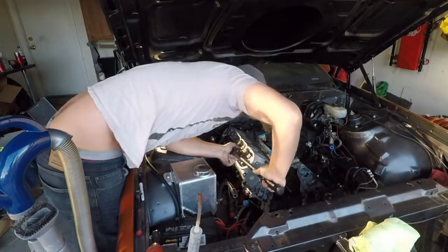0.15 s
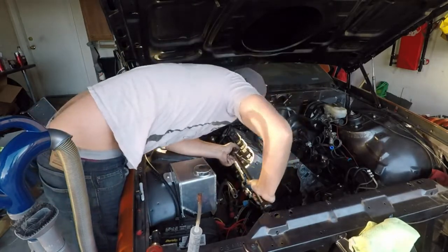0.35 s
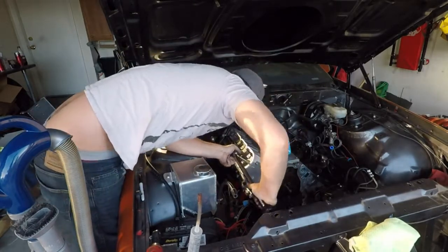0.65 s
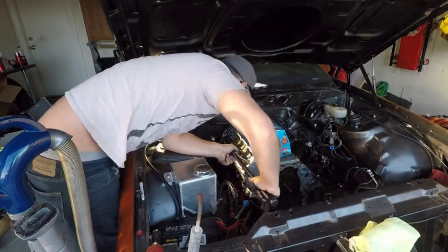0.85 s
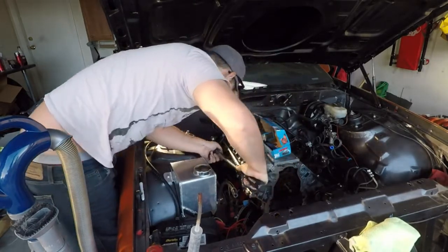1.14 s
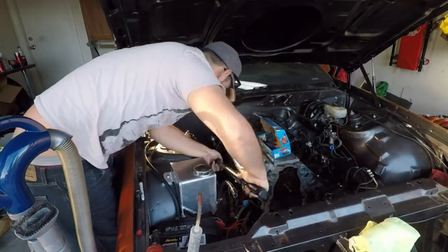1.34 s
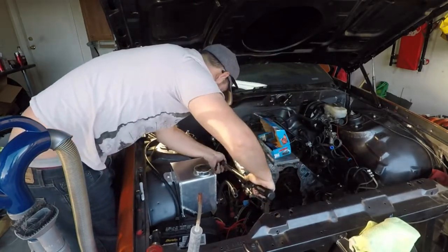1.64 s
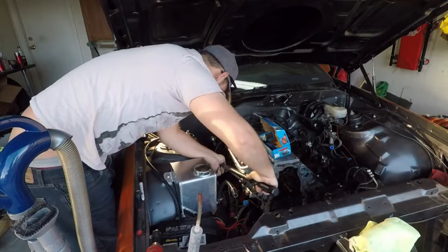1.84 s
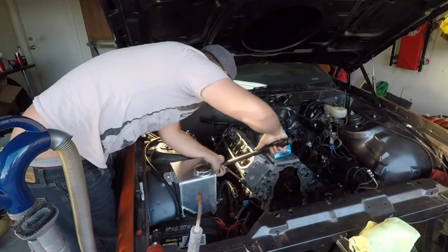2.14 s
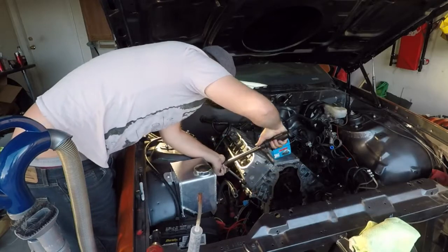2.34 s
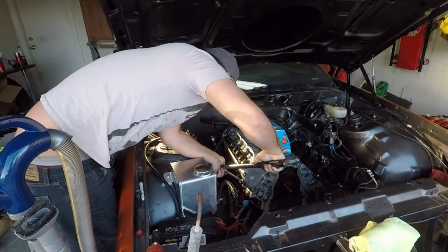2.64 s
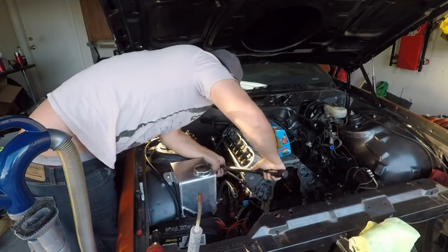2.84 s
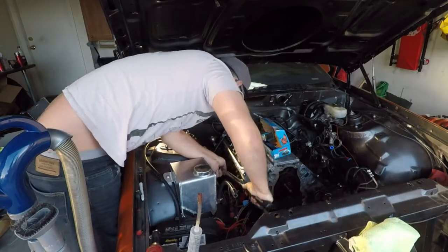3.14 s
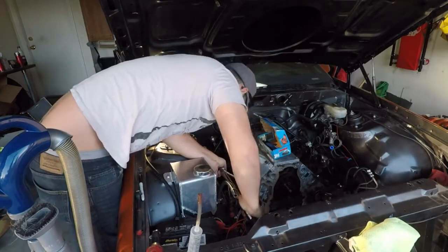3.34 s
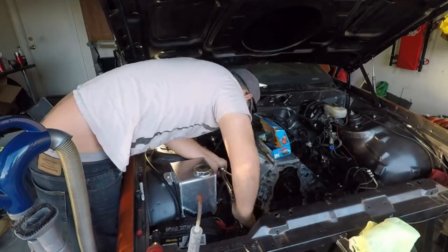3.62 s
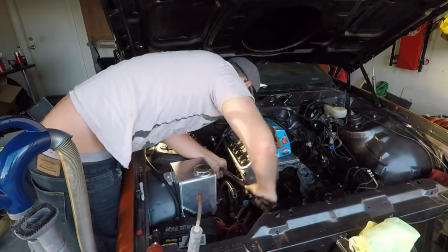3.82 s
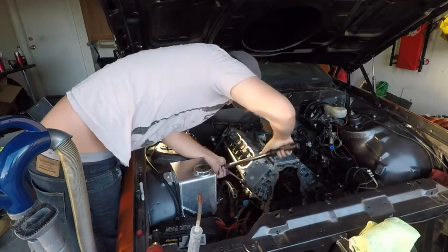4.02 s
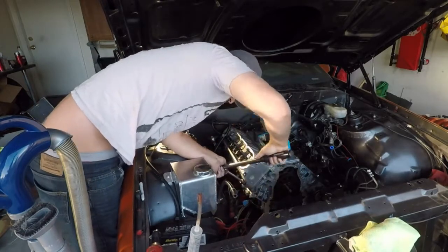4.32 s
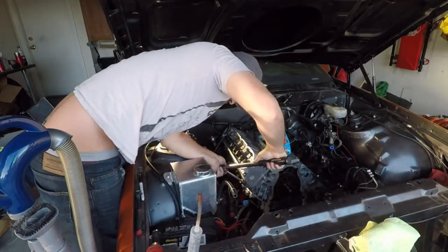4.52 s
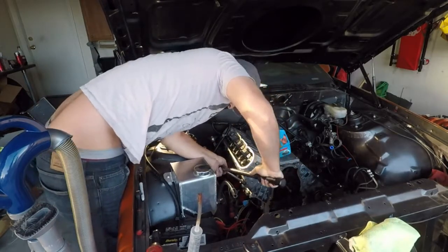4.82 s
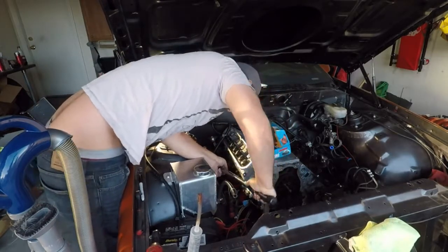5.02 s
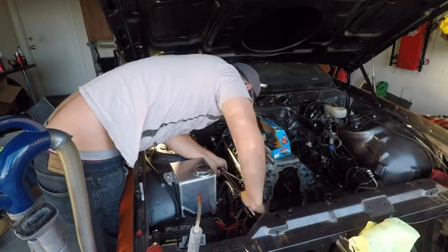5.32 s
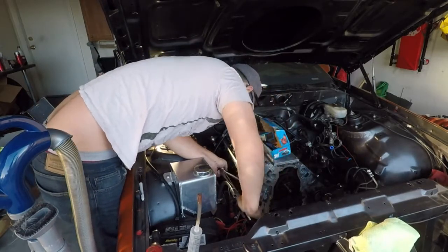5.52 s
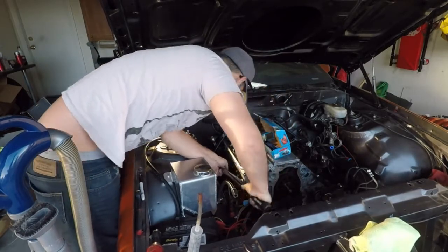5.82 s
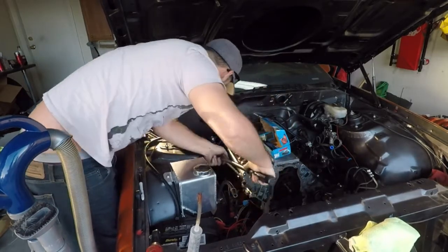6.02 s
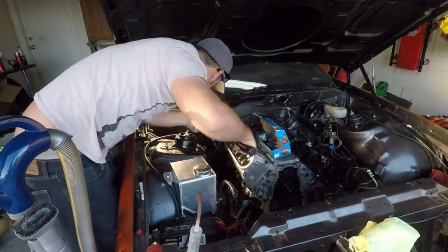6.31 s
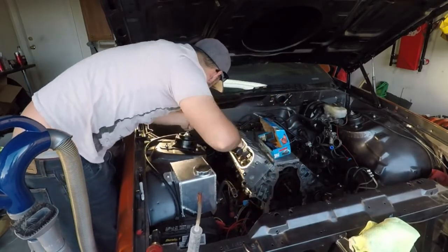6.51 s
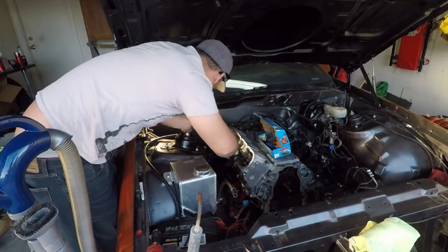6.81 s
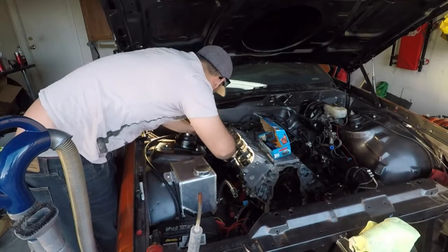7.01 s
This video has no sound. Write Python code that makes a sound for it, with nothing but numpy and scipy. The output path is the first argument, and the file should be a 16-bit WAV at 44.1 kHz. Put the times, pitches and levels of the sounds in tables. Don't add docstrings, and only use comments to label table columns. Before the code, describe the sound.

Two hard, bright steel cracks open the scene, followed by several quieter socket knocks on an engine. After a lull, six thin ratchet teeth tick past quickly; a second pair of cracks comes later, then light knocks and tiny ticks. The sound is close and dry with a brief garage echo. Low buffeting air presses on the small microphone and swells in the last second, above soft distant traffic and hiss.

```python
import sys
import numpy as np
from scipy import signal
from scipy.fft import rfft, irfft
from scipy.io import wavfile
from scipy.ndimage import uniform_filter1d

SR = 44100
rng = np.random.default_rng(int(sys.argv[2]) if len(sys.argv) > 2 else 0)


def natural_amplitude(level_db):
    exponent = np.asarray(level_db, float) / 20
    return 10 ** exponent


def dump_mix(stems):
    frames = np.atleast_2d(stems).T
    limited = np.clip(frames, -1, 1)
    pcm = np.round(limited * 32767).astype(np.int16)
    wavfile.write(sys.argv[1], SR, pcm)


N = 315756

# start_s, end_s, pitch_hz, level_db
DRONES = [
    (1.292, 3.492, 255.8, -65),
    (2.897, 3.601, 187.8, -66),
    (3.7, 5.298, 143.6, -63),
]
# freq_hz, density_db (per Hz)
WASH_COLOUR = [(50, -43), (90, -5.5), (160, -2.5), (255, -4), (360, -7.5), (500, -6.5), (800, -8),
               (1200, -14), (1700, -22.5), (2600, -27.5), (4000, -30), (7000, -37.5), (14000, -41),
               (16000, -52)]
WASH_DB = -51.5

# time_s, level_db
WIND = [(0, -30.5), (.4, -56), (.65, -37.5), (1.1, -42), (1.5, -43), (1.9, -42), (2.25, -48.5), (2.75, -57),
        (3.1, -48), (3.25, -44), (3.6, -36), (4.35, -42.5), (4.7, -33.5), (5.1, -42.5), (5.55, -31.5),
        (5.65, -30), (6.45, -27), (7.16, -17.5)]
WIND_REF_DB = -35
# time_s, half_length_s, rise_db, sharpness (0-1)
GUSTS = [(0.326, 0.059, 10, 0.36), (0.642, 0.03, 7, 0.24), (0.822, 0.039, 14, 0.48),
         (0.958, 0.055, 9.5, 0.97), (1.18, 0.07, 7, 0.66), (1.441, 0.076, 11, 0.6), (1.695, 0.023, 6, .2),
         (2.274, 0.054, 15.5, 0.1), (3.22, 0.039, 4.5, 0.59), (3.352, 0.032, -0.5, 0.5),
         (3.576, 0.044, 6.5, 0.9), (3.677, 0.032, 7, 0), (4.079, 0.037, 8, 0), (4.557, 0.02, 5, 0.5),
         (4.65, 0.038, 8, 0.94), (4.92, 0.056, 5.5, 0.23), (5.259, 0.057, 12, 0.07),
         (5.45, 0.057, 1.5, 0.2), (5.61, 0.056, 9, 0.88), (5.755, 0.12, 14, 0.74), (5.946, 0.039, 8.5, .3),
         (6.09, 0.043, 14, 0.57), (6.2, .05, 8, 0.53), (6.284, .04, 5, 0.6), (6.443, 0.049, 7, 0),
         (6.675, 0.071, 8, 0.86), (6.85, 0.062, 5, 0.76), (6.953, 0.038, 7, 0.78), (7.09, 0.032, 8.5, 1)]
# freq_hz, density_db (per Hz)
PUSH = [(1, -20), (3, -1), (12, -1), (18, -8), (30, -50), (60, -120)]
THROB = [(8, -80), (14, -25), (18, -1), (35, -5), (55, -12), (80, -50), (150, -120)]
FLUTTER = [(25, -91), (45, -27.5), (55, 8.5), (100, -5.5), (150, -14.5), (250, -39.5), (600, -120)]
RUFFLE = [(60, -92.5), (120, -23.5), (150, 4), (300, -9.5), (500, -15), (1000, -46.5), (3000, -110)]
# level_db (at reference wind), slope_db_per_db, favoured_sharpness (0-1), levelling_s
DEPTHS = [
    (-26, 0.64, 0.09, 0.36),
    (-36.5, 0.94, 0.2, 0.13),
    (-47.5, 0.98, .75, 0.056),
    (-69, 1.4757, 0.93, 0.085),
]

# freq_hz, t60_s
GARAGE_T60 = [(500, .45), (1500, .45), (4000, 0.27), (8000, 0.21), (14000, 0.13)]
LATE_DB, LATE_T60_S = -27.5, 1.1

# freq_hz, density_db (per Hz)
CRACK_COLOUR = [(240, -51), (400, -44.5), (663, -47), (1080, -12.5), (3110, -4), (3680, -4), (4420, -5.5),
                (5560, -1), (7910, -13.5), (10700, -6.5), (15500, -15.5)]
# freq_hz, t60_s
CRACK_T60 = [(500, 0.3), (1300, 0.11), (3500, 0.076), (9000, .065), (15000, 0.044)]
SNAP, SNAP_S = 0.91, 0.0017
BLUR_HZ, BLUR_SHARE = 45, .006
EDGE_DB_PER_OCTAVE = 23
KNOCK_S, HEAVY_S = 0.0043, 0.01

# freq_hz, level_db, t60_s
BREAK_MODES = [(1500, -16, .09), (2170, -10, .07), (3480, 3, .08), (4020, -6, .07), (4325, -7, .08),
               (5350, -5, .07), (5715, -6, .06), (6400, -10, .06), (9340, -13, .05), (10830, -17, .3),
               (10920, -9, .08)]
RESET_MODES = [(912, -15, .1), (2175, -7, .08), (2550, -6, .06), (2900, -8, .07), (3680, -11, .18),
               (3822, -1, .055), (5170, -3, .05), (5800, -8, .07), (10595, -9, .1), (10790, -19, .3),
               (12700, -11, .03)]
PAWL_MODES = [(3150, -25.5, .04), (4570, -2, 0.036), (5430, -1, 0.06), (9800, -20, 0.04),
              (10200, -7, 0.042), (11700, -24, .04)]
SOCKET_MODES = [(800, -15, .05), (925, -5, .075), (1265, -9, .045), (2320, -8, .05), (3450, -6, .045),
                (5200, -7, .04)]

# time_s, peak_db, contact_ring_hz
TICKS = [(1.8007, -54, 2487), (2.335, -49.5, 2168), (2.4005, -52, 1940), (2.49, -47.5, 2730),
         (3.782, -48, 2550), (4.3056, -49, 1760), (5.324, -53.5, 2050), (5.827, -39.5, 1740),
         (6.2867, -47.5, 1970), (6.4399, -52, 1800), (6.7015, -43.5, 3527)]
# time_s, peak_db, contact_ring_hz, length_s
SCRAPES = [
    (0.9528, -27, 5130, 0.02),
    (3.477, -41.5, 2280, 0.041),
    (3.5154, -46, 2370, 0.016),
    (5.973, -37, 2250, 0.031),
    (6.027, -51, 2010, 0.014),
]
# time_s, peak_db, contact_ring_hz
TOUCHES = [
    (.943, -35.5, 4660),
    (1.538, -36.5, 2260),
    (3.4408, -47, 5300),
    (3.827, -54, 2700),
    (5.899, -49.5, 2520),
]
# time_s, peak_db, contact_ring_hz, weight_db, edge_db
KNOCKS = [
    (1.019, -28.5, 4410, -8, -27),
    (1.5154, -27, 3350, -8, -35),
    (1.6359, -24, 5370, -39, -15.5),
    (1.6422, -26.5, 2720, -29.5, -20),
    (1.8649, -23.5, 5150, -5, -20.5),
    (2.1412, -29, 2410, -5, -23),
    (2.1441, -21.5, 3450, 2, -78),
    (5.9206, -21.5, 4300, -13, -23),
    (5.9402, -28, 2260, -5, -43),
]
# time_s, peak_db, contact_ring_hz
RATCHET = [
    (3.8482, -31.5, 5430),
    (3.8901, -30, 6030),
    (3.9291, -28.5, 5200),
    (3.9713, -28.5, 5600),
    (4.0163, -31.5, 4950),
    (4.0675, -31, 6450),
]
# time_s, peak_db, contact_ring_hz
RESETS = [
    (0.6193, -2.9, 3763),
    (5.5902, -3.5, 3660),
]
# time_s, peak_db, contact_ring_hz
BREAKS = [
    (0.407, -0.5, 3592),
    (5.3623, -1, 5710),
]


def evened(x):
    return x / np.sqrt(np.mean(x ** 2) + 1e-20)


def read(points, hz):
    f, value = np.transpose(points)
    return np.interp(np.log(hz + 1), np.log(f + 1), value)


def add(mix, s, sound):
    part = mix[:, round(s * SR):][:, :sound.shape[1]]
    part += sound[:, :part.shape[1]]


def coloured(points, size):
    hz = np.fft.rfftfreq(size, 1 / SR)
    white = rfft(rng.standard_normal(size))
    return evened(irfft(white * natural_amplitude(read(points, hz)), size))


def drones():
    t, out = np.arange(N) / SR, np.zeros(N)
    for start, end, hz, db in DRONES:
        waver = evened(np.interp(t, np.arange(80) / 10, rng.standard_normal(80)))
        fade = np.clip(np.minimum(t - start, end - t) / 0.14, 0, 1)
        phase = 2 * np.pi * np.cumsum(hz * (1 + .012 * waver)) / SR
        out += natural_amplitude(db + 2 * waver) * fade * np.sin(phase)
    return out


def wash():
    hz, t, z = signal.stft(coloured(WASH_COLOUR, size=N), SR, nperseg=1024)
    patches_db = rng.standard_normal(z.shape)
    patches_db = evened(uniform_filter1d(uniform_filter1d(patches_db, 10, 0), 12, 1))
    return natural_amplitude(WASH_DB) * signal.istft(z * natural_amplitude(patches_db), SR, nperseg=1024)[1][:N]


def buffeting():
    t, out = np.arange(N) / SR, np.zeros(N)
    coarse_t = t[::64]
    wind_db = np.interp(t, *np.transpose(WIND)) - WIND_REF_DB
    for colour, (db, slope, favoured, span) in zip((PUSH, THROB, FLUTTER, RUFFLE), DEPTHS):
        air = coloured(colour, size=N)
        power = uniform_filter1d(air ** 2, int(span * SR))
        power = uniform_filter1d(power, int(span * SR / 2))
        air /= np.sqrt(power + .05)
        gusts_db = np.zeros(len(coarse_t))
        for s, half, rise, sharp in GUSTS:
            match = max(1.3 - 1.1 * abs(sharp - favoured), 0)
            gusts_db += rise * match * np.exp(-((coarse_t - s) / half) ** 2)
        out += natural_amplitude(db + slope * wind_db + np.interp(t, coarse_t, gusts_db)) * air
    return out * np.sin(np.pi / 2 * np.clip((t[-1] - t) / .03, 0, 1)) ** 2


def garage(x):
    taps = np.zeros(SR)
    at = np.arange(300, SR - 20, 20)
    taps[at + rng.integers(0, 20, len(at))] = rng.choice([-1., 1.], len(at))
    hz, t, z = signal.stft(taps, SR, nperseg=256)
    early = natural_amplitude(-60 * t / read(GARAGE_T60, hz)[:, None])
    late = natural_amplitude(LATE_DB - 60 * t / LATE_T60_S)
    tail = signal.istft(z * (early + late), SR, nperseg=256)[1]
    return signal.fftconvolve(x, tail / np.linalg.norm(tail))[:N]


def ring(drive, hz, t60, blur_hz):
    t = np.arange(len(drive)) / SR
    near = hz + blur_hz * np.linspace(-1, 1, 7) + 0.33 * blur_hz * rng.standard_normal(7)
    beats = np.sin(2 * np.pi * (np.outer(t, near) + rng.random(7))).sum(1)
    out = signal.fftconvolve(drive, natural_amplitude(-60 * t / t60) * beats)[:len(t)]
    return out / abs(out).max()


def steel_crack(t, tilt, chatter, decay):
    hz, when, z = signal.stft(coloured(CRACK_COLOUR, size=len(t)), SR, nperseg=128)
    late = np.maximum(when - chatter, 0)
    fall_db = -60 * late / (decay * read(CRACK_T60, hz))[:, None]
    z = z * natural_amplitude(read(tilt, hz)[:, None] + fall_db)
    crack = signal.istft(z, SR, nperseg=128)[1][:len(t)]
    crack *= natural_amplitude(1.5 * evened(uniform_filter1d(rng.standard_normal(len(t)), 30)))
    return crack * (1 + SNAP * np.exp(-t / SNAP_S))


def broad_pulse(x):
    ramp = np.sin(np.pi * np.minimum(np.arange(len(x)) / 300, 1)) ** 2
    smooth = np.sqrt(abs(uniform_filter1d(abs(rfft(x)) ** 2, 50)))
    return np.roll(irfft(smooth, len(x)), 150) * ramp


def blow(row, modes, ring_db, contact_db, decay, spread_db, room_db, knee_hz=7000):
    s, db, low_db, high_db, chatter, contact_hz = row
    t = np.arange(int(.2 * SR)) / SR
    chatter = max(chatter, .0005)
    tilt = [(900, low_db + 17), (2000, 0), (knee_hz, 0), (2.4 * knee_hz, high_db + 14.5)]
    crack = steel_crack(t, tilt, chatter, decay)
    drive = rng.standard_normal(len(t)) * np.exp(-3 * t / chatter)
    luck_db = spread_db * rng.standard_normal(len(modes))
    rings = np.zeros(len(t))
    for (f, mode_db, t60), mode_luck_db in zip(modes, luck_db):
        level = natural_amplitude(mode_db + mode_luck_db + read(tilt, f))
        rings += level * ring(drive, f, t60, BLUR_HZ + BLUR_SHARE * f)
    contact = ring(drive, contact_hz, .04, .045 * contact_hz)
    tones = natural_amplitude(ring_db) * rings + natural_amplitude(contact_db) * contact
    to_walls = natural_amplitude(room_db) * broad_pulse(crack / 3 + .3 * tones)
    sound = np.array([crack / 3 + tones, to_walls])
    fade = np.minimum(t / .0007, 1) * np.minimum((t[-1] - t) / .06, 1)
    return s - .0008, natural_amplitude(db) * sound * fade


def edge(hz, at_4k_db):
    return at_4k_db + EDGE_DB_PER_OCTAVE * np.log2(hz / 4000)


def drive_ticks(mix):
    for s, db, hz in TICKS:
        add(mix, *blow((s, db, -13, -24, .005, hz), SOCKET_MODES, ring_db=-15.5, contact_db=-4.0,
                       decay=0.94, spread_db=-1.0, room_db=-5.0, knee_hz=3950))


def socket_contacts(mix):
    for s, db, hz, weight_db, edge_db in KNOCKS:
        chatter = KNOCK_S + HEAVY_S * natural_amplitude(2 * min(weight_db, 0))
        add(mix, *blow((s, db, weight_db, edge_db, chatter, hz), SOCKET_MODES, ring_db=-18, contact_db=-3.5,
                       decay=1.14, spread_db=2.5, room_db=-14.5, knee_hz=5600))
    for s, db, hz in TOUCHES:
        add(mix, *blow((s, db, -11, edge(hz, -25), .007, hz), SOCKET_MODES, ring_db=-16, contact_db=-6,
                       decay=1.1, spread_db=2.5, room_db=-12))
    for s, db, hz, length in SCRAPES:
        add(mix, *blow((s, db, -.6, edge(hz, -27.5), length, hz), SOCKET_MODES, ring_db=-16, contact_db=-3,
                       decay=0.32, spread_db=-2.5, room_db=-6.5, knee_hz=4800))


def ratchet(mix):
    for s, db, hz in RATCHET:
        add(mix, *blow((s, db, -32, -4.5, .0025, hz), PAWL_MODES, ring_db=-9, contact_db=-3.5,
                       decay=0.86, spread_db=2.5, room_db=-12.5))


def head_clicks(mix):
    for s, db, hz in BREAKS + RESETS:
        thump = ring(np.exp(-np.arange(3000) / 20.), 260, 0.028, 170)
        add(mix, s, natural_amplitude(db - 27.5) * np.array([thump, 0 * thump]))
    for s, db, hz in BREAKS:
        add(mix, *blow((s, db, -12, -11.5, .0047, hz), BREAK_MODES, ring_db=-11.5, contact_db=-7,
                       decay=0.97, spread_db=1.84, room_db=-15.0))
    for s, db, hz in RESETS:
        add(mix, *blow((s, db, -15.5, -13, .005, hz), RESET_MODES, ring_db=-9.5, contact_db=-11.0,
                       decay=0.99, spread_db=0.5, room_db=-14.5))


def wrench():
    mix = np.zeros((2, N))
    head_clicks(mix)
    ratchet(mix)
    socket_contacts(mix)
    drive_ticks(mix)
    return mix


def scene():
    direct, to_walls = wrench()
    return (direct + garage(to_walls) + buffeting() + wash() + drones())[None]


def low_pass(x):
    return signal.sosfilt(signal.butter(12, 16500, fs=SR, output="sos"), x)


def record(dry):
    held = np.pad(np.clip(dry, -.99, .99), ((0, 0), (127, 127)), "edge")
    limited = signal.oaconvolve(held, signal.firwin(255, 15250, fs=SR)[None], "valid")
    return low_pass(limited)


dry = scene()
out = record(dry)
dump_mix(out)
```